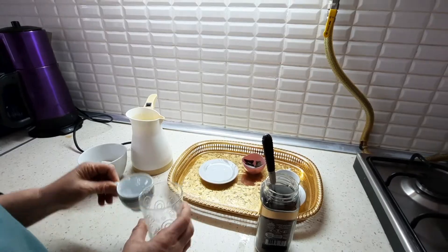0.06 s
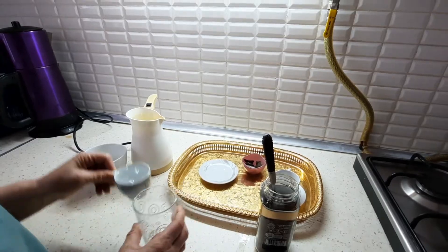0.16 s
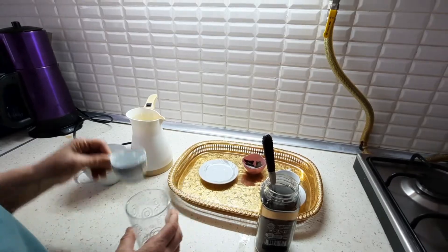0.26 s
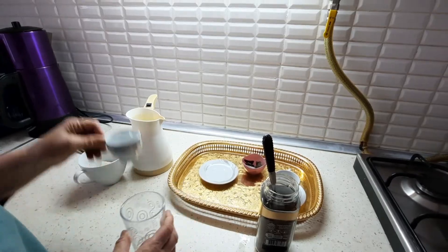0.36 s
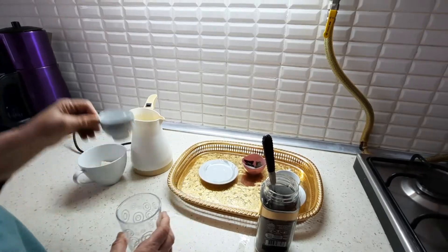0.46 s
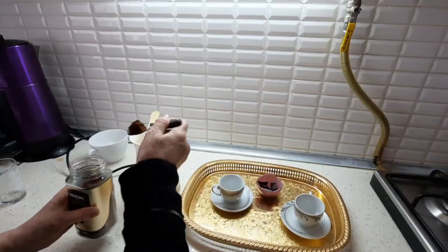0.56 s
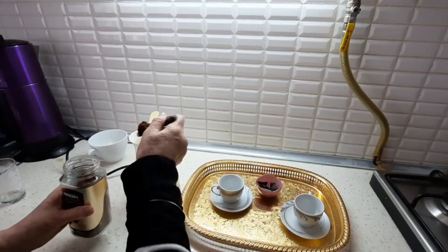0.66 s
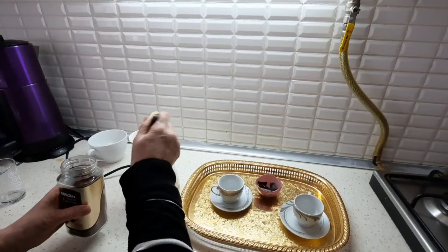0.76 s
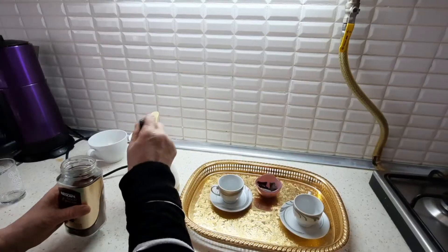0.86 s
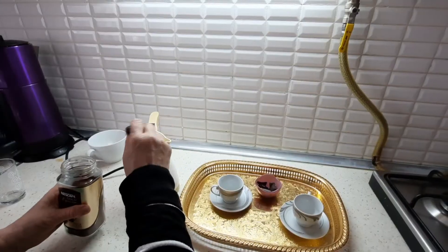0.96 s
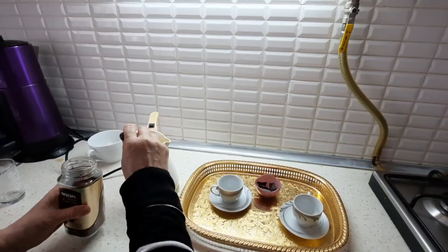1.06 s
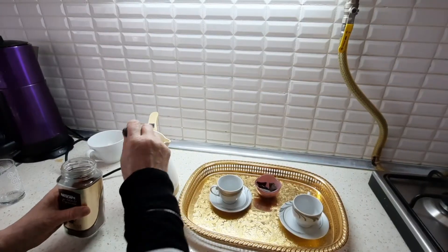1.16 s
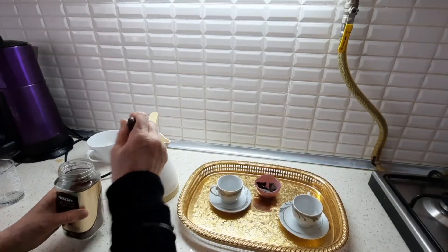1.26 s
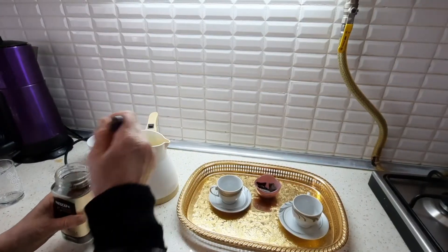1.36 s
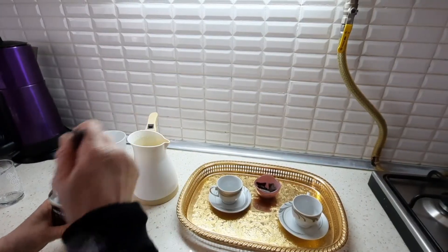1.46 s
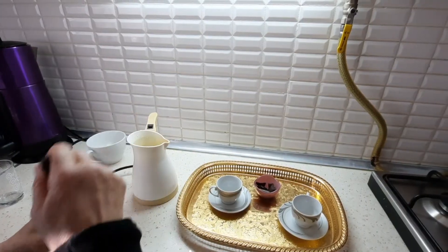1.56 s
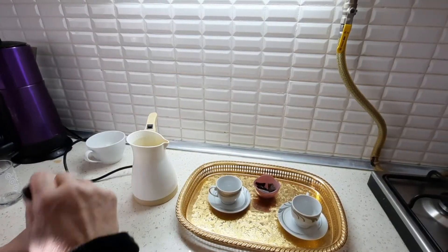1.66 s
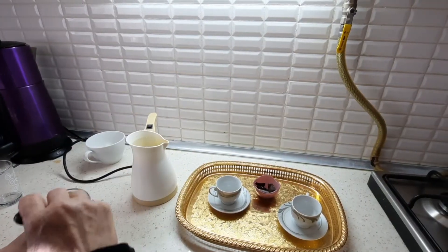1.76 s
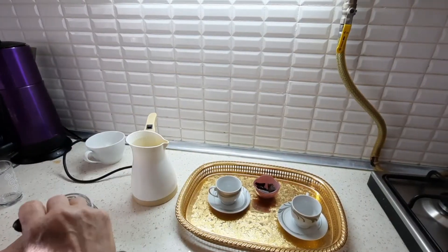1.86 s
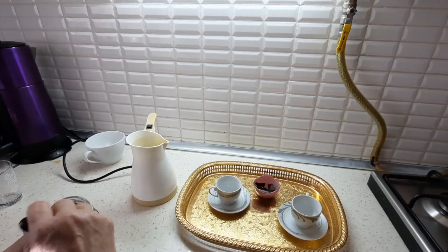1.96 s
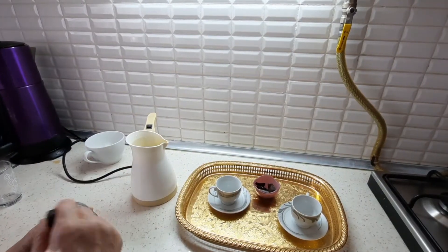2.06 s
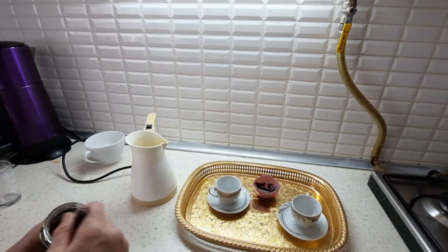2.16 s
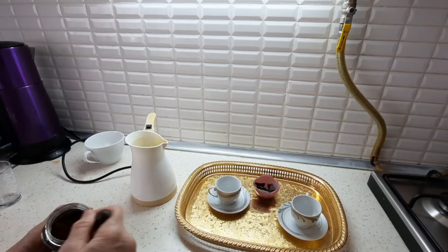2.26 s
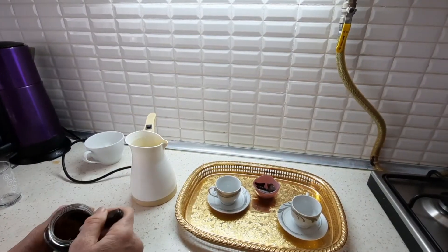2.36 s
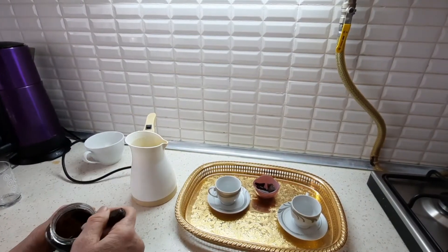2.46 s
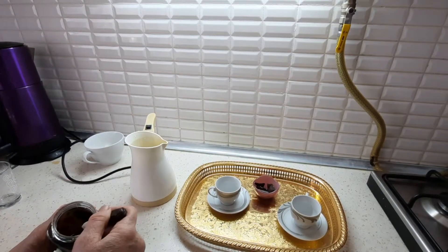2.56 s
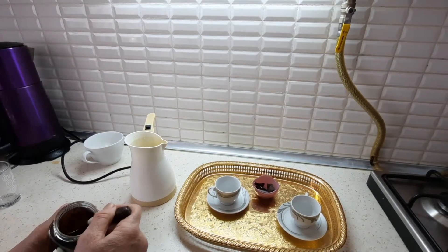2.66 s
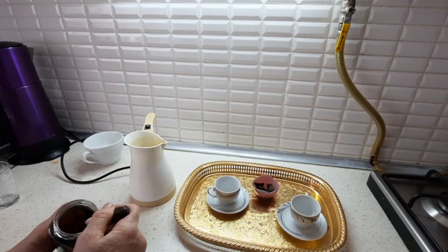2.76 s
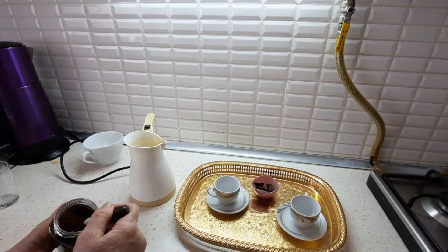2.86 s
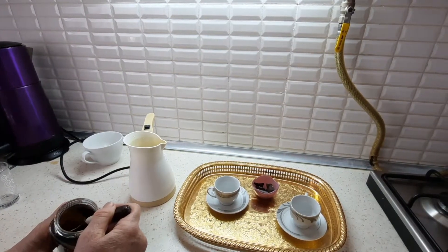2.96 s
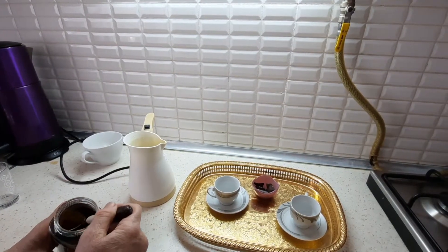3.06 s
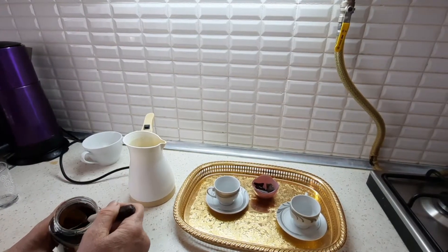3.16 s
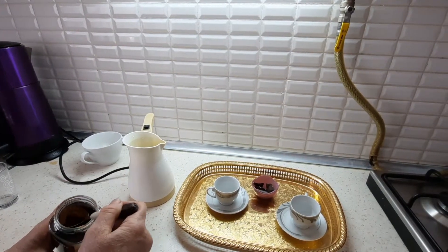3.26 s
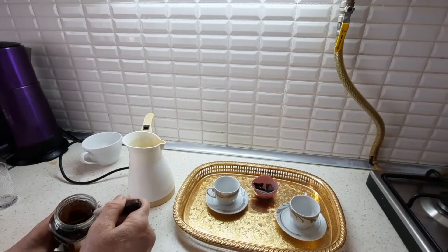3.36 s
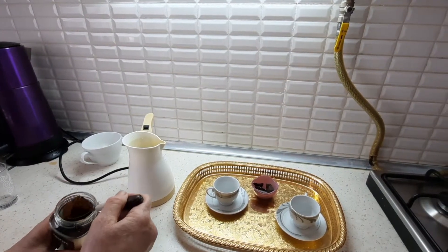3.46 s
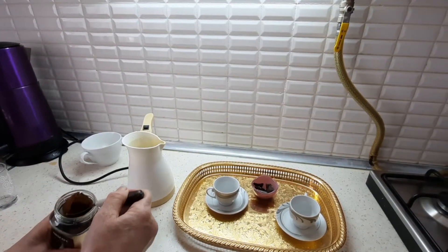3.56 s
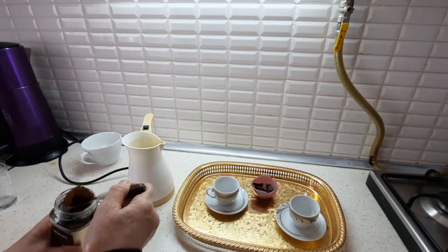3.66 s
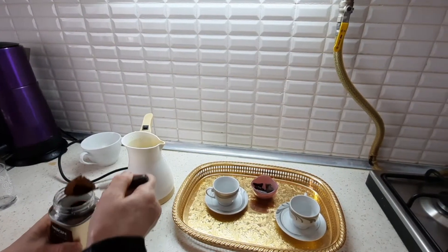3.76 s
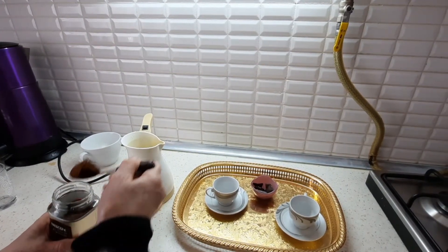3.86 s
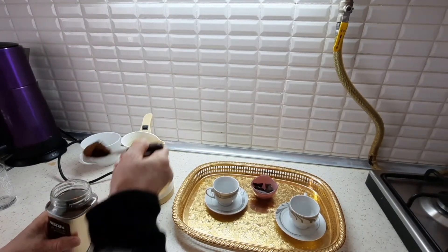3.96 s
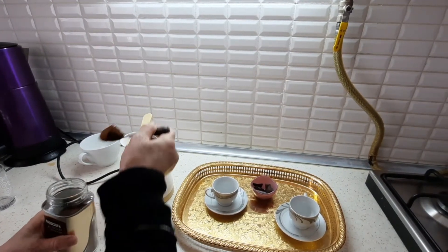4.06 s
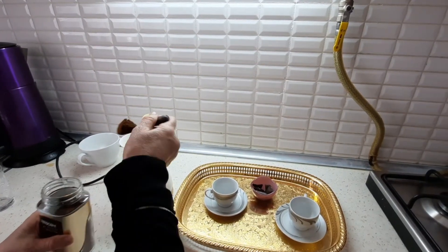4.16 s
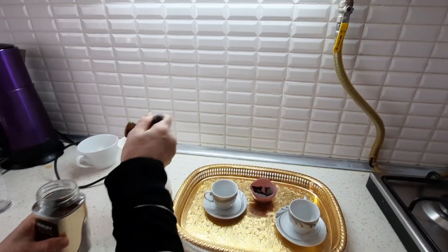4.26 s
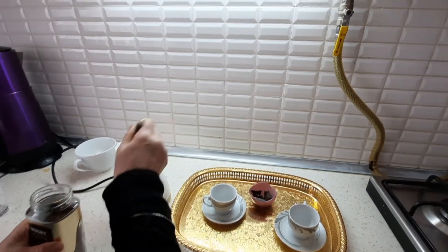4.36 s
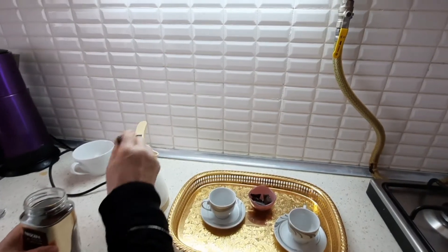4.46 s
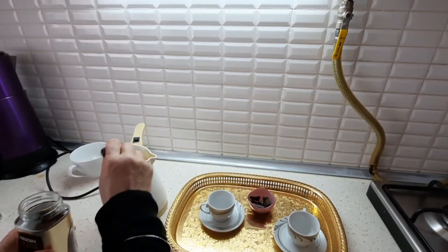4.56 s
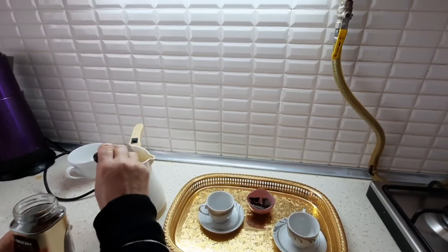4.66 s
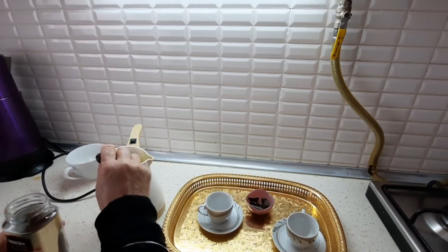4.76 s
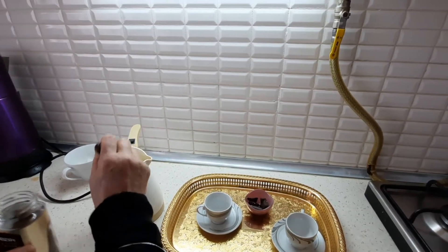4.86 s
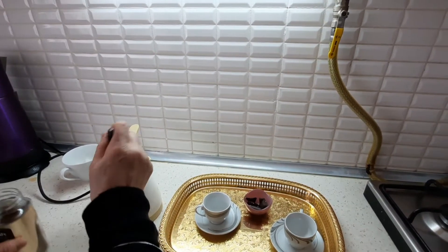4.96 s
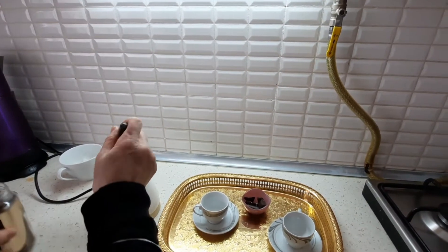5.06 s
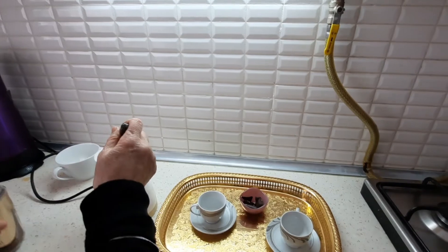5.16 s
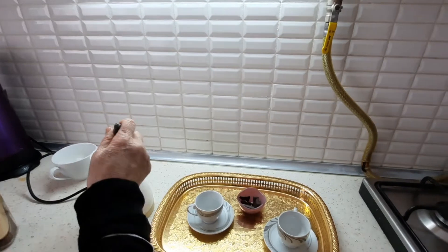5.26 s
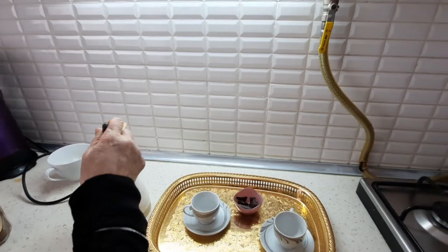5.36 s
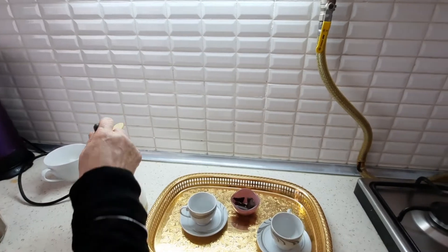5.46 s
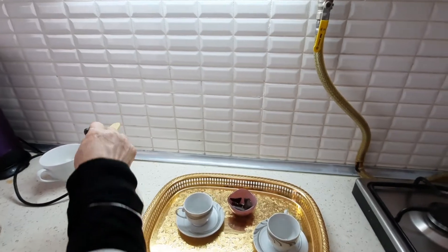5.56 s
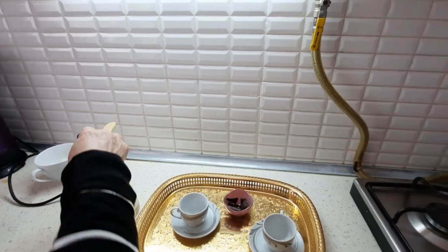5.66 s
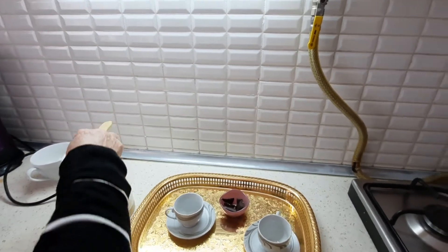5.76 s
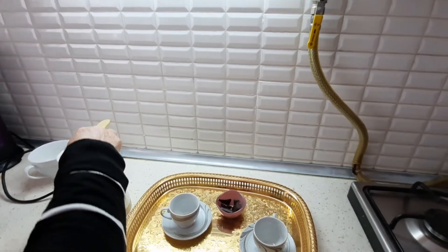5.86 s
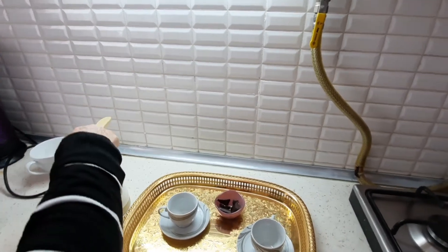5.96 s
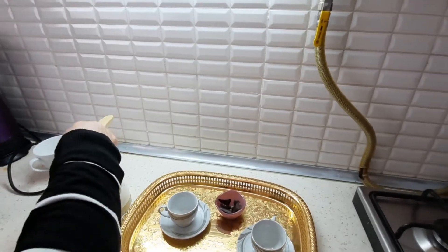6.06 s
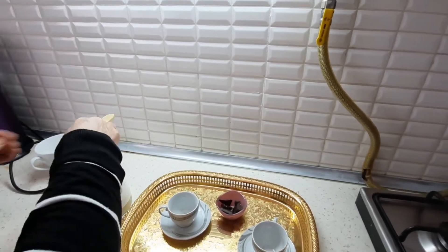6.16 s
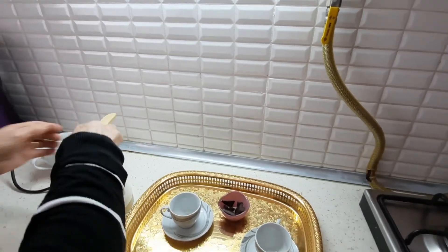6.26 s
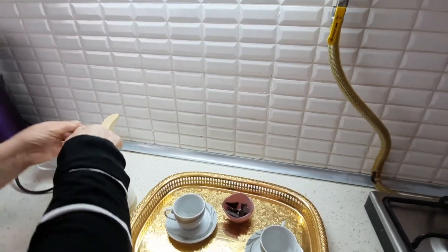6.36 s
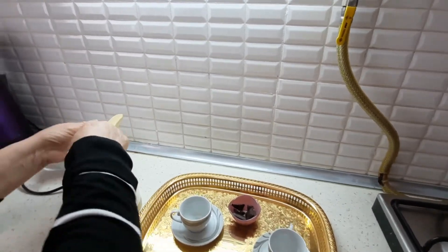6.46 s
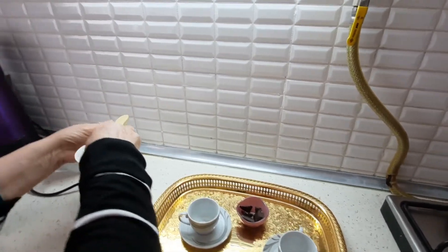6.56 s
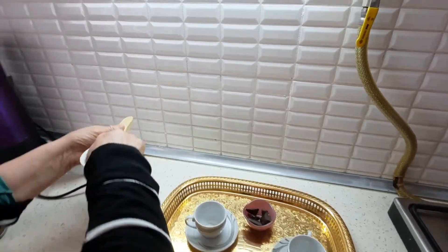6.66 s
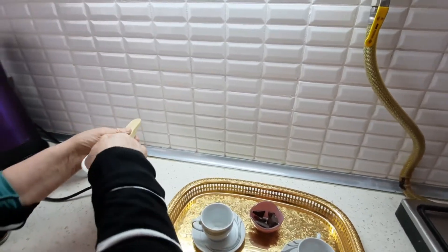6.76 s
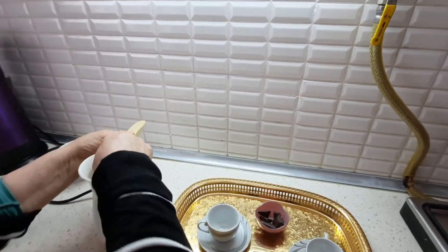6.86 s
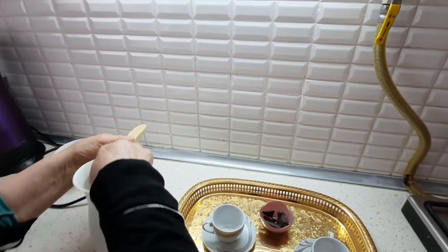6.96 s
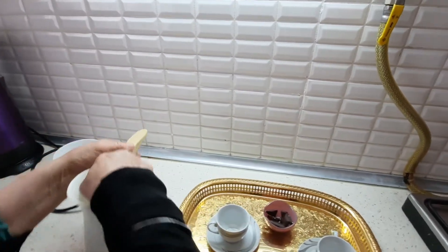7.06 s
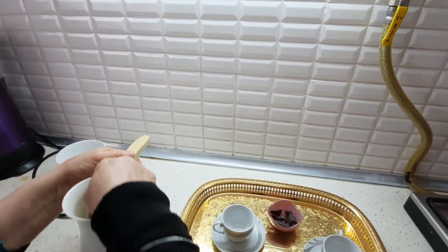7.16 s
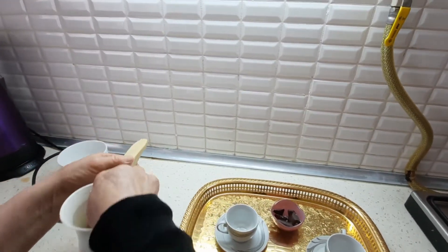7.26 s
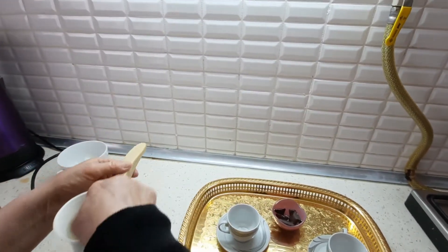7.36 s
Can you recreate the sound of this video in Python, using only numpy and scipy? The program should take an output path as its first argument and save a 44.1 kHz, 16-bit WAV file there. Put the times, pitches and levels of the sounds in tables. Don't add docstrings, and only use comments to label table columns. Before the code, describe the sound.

In a small tiled kitchen with a steady low appliance hum slightly to the right, a sleeve rustles faintly and a spoon clinks and digs in a glass jar of powder. Near five seconds the jar thumps down, bounces and judders along the worktop. Powder spills, then a spoon knocks and scrapes in a plastic pot to the end. Close stereo microphones catch short tiled echoes.

```python
import sys
import numpy as np
from scipy import signal
from scipy.fft import rfft, irfft
from scipy.io import wavfile
from scipy.ndimage import uniform_filter1d

SR = 44100
rng = np.random.default_rng(int(sys.argv[2]) if len(sys.argv) > 2 else 0)


def wav_out(sig):
    wavfile.write(sys.argv[1], SR, np.round(np.clip(np.atleast_2d(sig).T, -1, 1) * 32767).astype(np.int16))


def volts_from_db(level):
    exponent = np.asarray(level, float) / 20
    return 10 ** exponent


N = 326340
HZ = np.fft.rfftfreq(N, 1 / SR)
TIME = np.arange(N) / SR

# frequency in Hz, level in dB per Hz.
HUM_FLOOR = [(12, -77.5), (20, -38.5), (90, -26.5), (122, -30.5), (148, 4), (225, -22), (298, -0.5),
             (465, -11), (667, -10), (1100, -22), (1200, -22), (1720, -24), (6190, -36), (13900, -48.5),
             (15500, -54)]
# frequency in Hz, width in Hz, level in dB per Hz.
HUM_PEAKS = [(54, 5.5, -14.5), (96.66, 8.897, -7), (145.3, 4.4, -13), (295.97, 22.22, -1.5),
             (392.63, 8.6, -11), (667.43, 25.487, -5.5), (848.7, 7.8, -10), (1521.3, 9.1, -16),
             (2781.2, 56, -25), (3888.4, 15, -21.5), (4454.6, 14, -24), (6279.7, 187, -30.5)]
# time in seconds, level in dB.
APPLIANCE_LOAD = [(0, -1), (.28, 0.5), (.43, -0.5), (1.2, 0), (1.88, 2.5), (2.37, 1.5), (3.05, 1.5),
                  (3.36, 2.5), (3.55, 3), (3.7, -4), (3.9, 0), (4.15, 4), (4.39, 0.5), (4.61, 0), (4.8, 2),
                  (5.0, 1.5), (5.7, 0.5), (7.4, 1.5)]
# frequency in Hz, t60 in seconds.
ROOM_T60 = [(60, 0.2006), (300, 0.34654), (1000, 0.44305), (4000, 0.35944), (9000, 0.25307),
            (15000, 0.30856)]
# frequency in Hz, correlation from 0 to 1.
LIKENESS = [(80, 0.8264), (200, 0.9769), (400, 0.6918), (800, 0.18864), (1600, 0.022), (4000, 0.026)]
# frequency in Hz, left minus right in dB.
MIC_TILT = [(100, 1), (250, -3), (500, 4), (800, 1.5), (1600, -3), (3500, -3), (6500, -6), (11000, -6.5)]
# frequency in Hz, gain in dB.
MIC_RESPONSE = [(8000, -1), (10800, -7), (13000, -0.5), (14400, -10.5), (15000, -20), (16000, -32.5)]
# middle in seconds, length in seconds, level in dB.
REACHES = [
    (0.281, 0.393, -66.5),
    (1.933, 0.521, -71),
    (3.335, 0.4955, -65),
    (4.175, 0.589, -77.5),
    (4.92, 0.4873, -68),
]
# frequency in Hz, level in dB, t60 in seconds.
COUNTER_MODES = [(53.24, -15.5, 0.34), (100, -45.5, 0.068), (158.66, -10, 0.3054), (259.86, -18, 0.077),
                 (324.29, 3.5, 0.07836), (412.51, 8.5, 0.03326), (537.4, -19.5, 0.029),
                 (579.17, -3, 0.08797), (646.13, -5, 0.1068), (818, -35, .05)]
# frequency in Hz, level in dB, t60 in seconds.
SLAB_CROWD = [(199.7, -23, 0.19), (498.7, -5, 0.05134), (995.35, -12.5, 0.1108), (1463.4, -14, 0.03775),
              (2410, -30, 0.13266), (5470, -34.5, 0.1251), (9005, -36.5, 0.11), (14000, -59, .03)]
# start in seconds, peak in dB, clatter in dB.
THUMPS = [
    (5.0404, -6, -8.5),
    (5.053, -13, -5.5),
    (5.061, -9.5, -13.5),
    (5.17, -34.5, -24),
    (5.192, -18, -13.5),
    (5.358, -15.5, -19.5),
    (5.407, -19, -26.5),
]
# time in seconds, speed in dB, weight on the worktop in dB.
SLIDE = [
    (5.07, -1, -17.5),
    (5.154, -2.5, -15),
    (5.198, -1, 1),
    (5.27, -2, 4.5),
    (5.376, -2, 6),
    (5.41, -6, -8),
    (5.51, -14, -6.5),
    (5.6, -44.5, -48),
    (5.66, -76, -30),
]
# frequency in Hz, level in dB, t60 in seconds.
JAR_MODES = [(1851.9, -26, 0.051), (2899.9, 1.5, 0.0263), (3036.9, 0, 0.0369), (3413.8, -11, 0.04146),
             (4321.8, -9.5, 0.054), (5422.4, -18, 0.05), (4480, -13, .15), (4545, -1.5, .14),
             (5745, -2, .09), (6454, -10, 0.07), (8852, -18.5, 0.037), (9860, -32.5, 0.03513),
             (10620, -24, 0.053), (12900, -27.5, 0.1099), (13800, -42, 0.09966)]
# frequency in Hz, level in dB, t60 in seconds.
GRIT_CROWD = [(485, -20, 0.03183), (740, -8.5, 0.053), (1475.8, -14.5, 0.0871), (2731, 1.5, 0.02548),
              (6643, 2, 0.05482), (10400, -7.5, 0.03015), (13500, -22, 0.013)]
# frequency in Hz, level in dB, t60 in seconds.
FIZZ_CROWD = [(4000, -19.5, 0.0299), (7003, -3, 0.0402), (10107, -13.5, 0.0623), (13112, -10, 0.0986),
              (15000, -5.5, .25)]
# start in seconds, peak in dB, spoon ring in dB, grit in dB, seconds until choked.
CLINKS = [
    (1.0497, -69, 27.5, 24, 0.0224),
    (1.6513, -21, -16, -5, 0.0082),
    (1.6566, -16, -19.5, -11, 0.002982),
    (2.316, -46.5, -16, -6.5, 0.00766),
    (2.77, -65.5, 9.5, 8, 0.00762),
    (3.030, -40.5, 4.5, 6.5, 0.00633),
    (3.644, -64, -14, 2, .011),
    (3.836, -75, 5, 12, .01),
]
# start in seconds, crunch in dB.
SCOOPS = [
    (0.954, -60.5),
    (1.859, -58.5),
    (1.988, -53),
    (2.031, -53.5),
    (2.178, -55.5),
    (2.2, -58.5),
    (2.896, -61),
]
# start in seconds, level in dB.
SPILLS = [
    (1.0457, -47),
    (3.031, -60.5),
    (5.885, -51),
    (5.9892, -30),
    (6.087, -56.5),
    (6.89, -40.5),
]
# frequency in Hz, level in dB, t60 in seconds.
POT_MODES = [(168.87, 2.5, 0.020023), (221.56, -13, 0.04582), (319.64, -2.5, 0.045), (659.98, -10, 0.08121),
             (728.97, 4, 0.06501), (1046.3, 0, 0.03072), (2065.3, -1.5, 0.01058)]
# frequency in Hz, level in dB, t60 in seconds.
WALL_CROWD = [(250.3, -6.5, 0.17468), (610.2, -4, 0.04163), (1150, -3, 0.042), (1963, -2.5, 0.03608),
              (3641, -6.5, 0.04288), (5596, -1, 0.024824), (7371, -1.5, 0.03873), (9150.6, -18, 0.03381),
              (14588, -14.5, 0.016)]
# start in seconds, peak in dB, belly in dB, rim in dB.
BEATS = [(5.887, -42.5, 8, 3.5), (5.9385, -44, 8.5, -15.5), (5.9806, -34.5, -6, -12),
         (5.9899, -28, 2.5, 7.5), (6.0303, -25.5, -11, -9), (6.0486, -30, -0.5, -8),
         (6.0854, -42, 0.5, -2.5), (6.12, -11.5, -4.5, -4), (6.2755, -53.5, -9, 14.5),
         (6.3052, -11, -5.5, -4), (6.3451, -25, 4, -17.5), (6.452, -37, 11.5, -30),
         (6.4753, -20.5, -1, -2.5), (6.579, -49.5, 16.5, -8.5), (6.6365, -21, -8.5, -2.5),
         (6.6879, -15.5, -6, -1.5), (6.7344, -36, 8.5, -11.5), (6.759, -29.5, 2.5, -4),
         (6.775, -20, -2, -4.5), (6.799, -29.5, -2.5, -7.5), (6.8578, -25.5, -4.5, -8.5),
         (6.8903, -7, -3, 3.5), (6.9144, -46, 10, 15), (7.0142, -14, -7, 2), (7.12, -35, 5.5, -2),
         (7.142, -38, 8.5, -8), (7.1792, -24, 0.5, -11.5), (7.2857, -13, -4, -4.5),
         (7.3124, -22, -0.5, -28)]
# time in seconds, weight on the pot in dB, spoon speed in dB.
STIR = [
    (5.86, -18, -39),
    (5.93, -4, -13.5),
    (6.04, -7.5, 7.5),
    (6.19, -11, -40),
    (6.33, -18.5, -12),
    (6.68, -35, -5),
    (6.77, -6.5, 3),
    (6.93, 6, -0.5),
    (7.4, -2, 2),
]


def on_hz(hz, table):
    hz_column, value = np.array(table)[:, :2].T
    return np.interp(np.log(np.maximum(hz, 1)), np.log(hz_column), value)


def unit(x):
    return x / np.sqrt(np.mean(x ** 2))


def band(x, lo_hz, hi_hz):
    return signal.sosfilt(signal.butter(2, [lo_hz, hi_hz], "band", fs=SR, output="sos"), x)


def octave_share(hz, octave, per_octave):
    return np.cos(np.pi / 2 * np.clip(per_octave * (np.log2(hz + 1) - octave), -1, 1)) ** 2


def walk(rate):
    k = int(SR / rate)
    held = np.repeat(rng.standard_normal(N // 200), k)[:N]
    return unit(uniform_filter1d(uniform_filter1d(held, k), k))


def controls(table):
    s, *columns = np.transpose(table)
    return [np.interp(TIME, s, c, -120, c[-1]) for c in columns]


def diffuse(size, direct=0.):
    like = np.clip(on_hz(np.fft.rfftfreq(size, 1 / SR), LIKENESS), 0, 1)
    like = like + np.clip(direct, 0, 1) * (1 - like)
    mid, side = rfft(rng.standard_normal((2, size))) * np.sqrt([(1 + like) / 2, (1 - like) / 2])
    return irfft([mid + side, mid - side], size)


def ring(modes, colour_db, scatter_db, detune=0., choke_s=9., choked_t60=0.0073):
    hz, db, t60 = np.array(modes).T[:, :, None]
    t = np.arange(SR // 4) / SR
    chance = rng.standard_normal((4, len(modes), 1))
    choke_db = -60 * np.maximum(t - choke_s, 0) / choked_t60
    fade = volts_from_db(db + colour_db[:, None] - 60 * t / t60 + choke_db)
    phase = 2 * np.pi * hz * (1 + detune * chance[0]) * t
    apart = np.clip(hz / 1500, 0, 3) * chance[1]
    left = volts_from_db(scatter_db * chance[2]) * fade * np.sin(phase)
    right = volts_from_db(scatter_db * chance[3]) * fade * np.sin(phase + apart)
    return np.array([left.sum(axis=0), right.sum(axis=0)]) * np.minimum(t / 0.0008782, 1)


def crowd(table, colour_db=((1, 0), (2, 0)), rise_s=0.00031):
    size = 4096
    t, hz = np.arange(size) / SR, np.fft.rfftfreq(size, 1 / SR)
    noise, out = rfft(diffuse(size)), 0
    t60_table = np.array(table)[:, ::2]
    for octave in np.arange(7, 14.1, .5):
        centre_hz = 2 ** octave
        part = unit(irfft(noise * octave_share(hz, octave, 2), size))
        level_db = on_hz(centre_hz, table) + on_hz(centre_hz, colour_db)
        decay_db = 60 * np.maximum(t - rise_s, 0) / on_hz(centre_hz, t60_table)
        out = out + volts_from_db(level_db - decay_db) * part
    return out * np.minimum(t / rise_s, 1)


def friction(blows, rate, spread_db):
    sizes = volts_from_db(spread_db * np.minimum(rng.exponential(size=N), 3.0)) * rng.standard_normal(N)
    slips = (rng.random(N) < rate / SR) * sizes
    spot = rng.integers(len(blows), size=N)
    return unit(sum(signal.fftconvolve((slips * (spot == k))[None], blow)[:, :N]
                    for k, blow in enumerate(blows)))


def add(out, sound, s, db, pan_db=0.):
    i = int(s * SR)
    n = min(sound.shape[1], N - i)
    out[:, i:i + n] += sound[:, :n] * volts_from_db(db + np.array([[pan_db], [-pan_db]]) / 2)


def hum():
    power = volts_from_db(2 * on_hz(HZ, HUM_FLOOR) - 6)
    for hz, width_hz, db in HUM_PEAKS:
        power = power + volts_from_db(2 * db) / (1 + (2 * (HZ - hz) / width_hz) ** 2)
    spectrum = rfft(diffuse(N, direct=0.1)) * np.sqrt(power)
    low, high = 0, 0
    for octave in np.arange(4, 14.1, .5):
        flicker_db = min(octave / 11, 1) ** 2 * (1.2564 * walk(2.802) + 0.8353 * walk(12))
        part = volts_from_db(flicker_db) * irfft(spectrum * octave_share(HZ, octave, 2), N)
        if octave < 10:
            low = low + part
        else:
            high = high + part
    lag_s = .0002
    low[0], high[0] = np.roll([low[0], high[0]], int(lag_s * SR), axis=1)
    load_db, = controls(APPLIANCE_LOAD)
    return volts_from_db(-53 + 0.7937 * load_db) * unit(low) + volts_from_db(-63.5 + load_db) * unit(high)


def tiles():
    size = int(.6 * SR)
    t, hz, noise = np.arange(size) / SR, np.fft.rfftfreq(size, 1 / SR), rfft(diffuse(size))
    tail = 0
    for octave in range(5, 15):
        fade = volts_from_db(-60 * t / on_hz(2. ** octave, ROOM_T60))
        tail = tail + irfft(noise * octave_share(hz, octave, 1), size) * fade
    tail = tail * np.clip((t - .002) / 0.0047, 0, 1)
    return tail / np.sqrt(np.sum(tail ** 2) / 2)


def sleeve():
    swell = 0
    for s, length_s, db in REACHES:
        swell = swell + volts_from_db(db) * np.cos(np.pi * np.clip((TIME - s) / length_s, -.5, .5)) ** 2
    return swell * volts_from_db(1.728 * walk(25.131)) * unit(band(diffuse(N), 1100, 3000))


def counter():
    out, flat = np.zeros((2, N)), np.zeros(len(COUNTER_MODES))
    for s, db, clatter_db in THUMPS:
        add(out, ring(COUNTER_MODES, flat, 4.096, detune=0.023045), s, db - 12.0)
        add(out, crowd(SLAB_CROWD), s, db + clatter_db)
    speed_db, weight_db = controls(SLIDE)
    judder = friction([ring(COUNTER_MODES, flat, 0.8)], 700, 0.74)
    clatter = friction([crowd(SLAB_CROWD) for spot in range(3)], 670, 3.6)
    boom = unit(band(judder, 77, 184.61))
    body = unit(band(judder, 305.82, 345))
    knock = unit(band(band(judder + 0.4847 * clatter, 351.76, 743.2), 250, 1300))
    rasp = unit(band(clatter, 1847.3, 9000)) + volts_from_db(-20) * unit(band(clatter, 11624, 14500))
    out += volts_from_db(weight_db - 31.5) * boom
    out += volts_from_db(0.8215 * speed_db - 29) * body
    out += volts_from_db(3.0423 * speed_db - 26) * knock
    return out + volts_from_db(0.542 * speed_db - 51.5) * rasp * (speed_db > -60)


def jar():
    out, hz = np.zeros((2, N)), np.array(JAR_MODES)[:, 0]
    spoon = (hz > 2500) & (hz < 3200)
    rim = (hz > 5000) & (hz < 6000)
    for s, db, spoon_db, grit_db, choke_s in CLINKS:
        rim_db = .4 * min(db + 20, 0)
        add(out, ring(JAR_MODES, spoon * spoon_db + rim * rim_db, 0.41, choke_s=choke_s), s, db, 1.5)
        add(out, crowd(GRIT_CROWD, rise_s=0.002767), s, db + grit_db - 14)
    for s, db in SPILLS:
        add(out, crowd(FIZZ_CROWD), s, db)
    for s, db in SCOOPS:
        add(out, ring(JAR_MODES, spoon * -8., 0.41, choke_s=0.012), s, db - 20, 1.5)
        add(out, crowd(GRIT_CROWD, rise_s=0.00481), s, db - 8)
    return out


def pot():
    out, hz = np.zeros((2, N)), np.array(POT_MODES)[:, 0]
    pan_db, lifted_s = -0.5, 6.66
    for s, db, belly_db, rim_db in BEATS:
        counter_db = -4.5 - 0.832 * (db + 30)
        colour_db = [(300, counter_db), (690, belly_db), (1020, belly_db), (1350, 0), (2800, 0), (4400, rim_db)]
        belly = ring(POT_MODES, on_hz(hz, colour_db), 0.3667, detune=0.02822)
        add(out, belly, s, db - (9 if s > lifted_s else 15), pan_db - 1.2949)
        add(out, crowd(WALL_CROWD, colour_db, rise_s=0.001716), s, db - 11.0, pan_db + 3.5)
    weight_db, speed_db = controls(STIR)
    judder = friction([ring(POT_MODES, np.zeros(len(POT_MODES)), 1.942)], 600, 1.672)
    boom = unit(band(judder, 80.62, 322.76))
    body = unit(band(band(judder, 690, 869.3), 603.5, 846.55))
    out += volts_from_db(weight_db - 42) * boom + volts_from_db((weight_db + speed_db) / 2 - 49) * body
    grains = friction([crowd(WALL_CROWD) for spot in range(3)], 700, 2.263)
    scrape, whistle = unit(band(grains, 1680, 9354)), unit(band(grains, 13580, 13588))
    return out + volts_from_db(speed_db - 51.5) * scrape + volts_from_db(1.64 * speed_db - 65.5) * whistle


def scene():
    sources = [jar() + sleeve(), pot(), counter()]
    wet = sum(volts_from_db(db) * x[1] for db, x in zip([-3.2, -3.4, -4.1], sources))
    drift_s = .025
    places = [np.cos(np.pi * (TIME / drift_s - k) / 3) ** 2 / np.sqrt(9 / 8) for k in range(3)]
    echoes = sum(signal.fftconvolve((wet * place)[None], tiles())[:, :N] for place in places)
    near = sum(sources) + echoes
    return signal.sosfilt(signal.butter(2, 95, "high", fs=SR, output="sos"), near) + hum()


def low_pass(x):
    return signal.sosfilt(signal.butter(12, 15690, fs=SR, output="sos"), x)


def record(dry):
    tilt_db = on_hz(HZ, MIC_TILT) / 2
    gain = volts_from_db(on_hz(HZ, MIC_RESPONSE) + np.array([tilt_db, -tilt_db]))
    mix = irfft(rfft(dry) * gain, N)
    return low_pass(mix)


dry = scene()
out = record(dry)
wav_out(out)
```